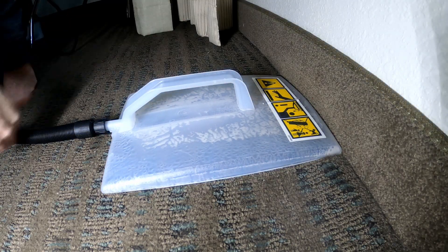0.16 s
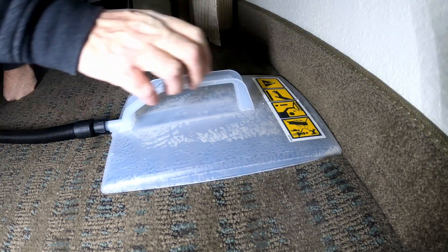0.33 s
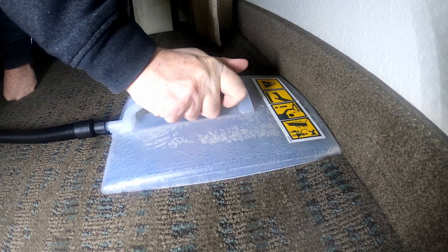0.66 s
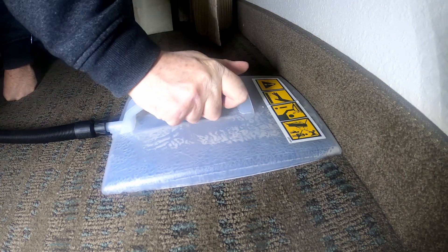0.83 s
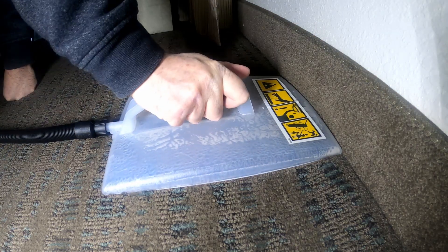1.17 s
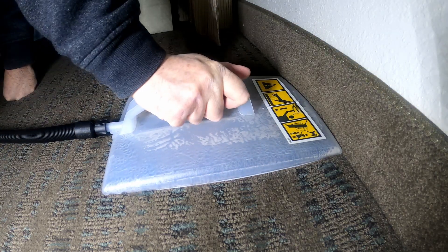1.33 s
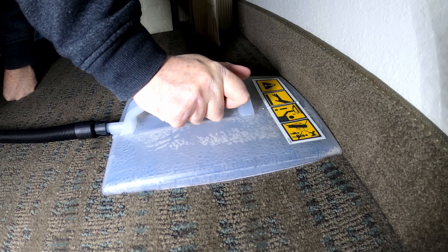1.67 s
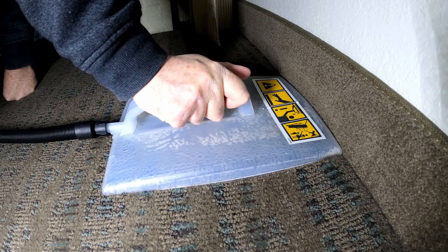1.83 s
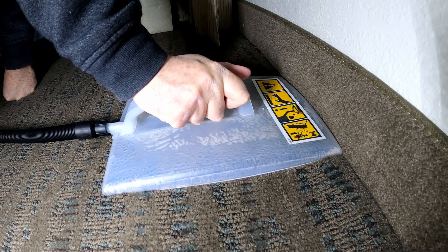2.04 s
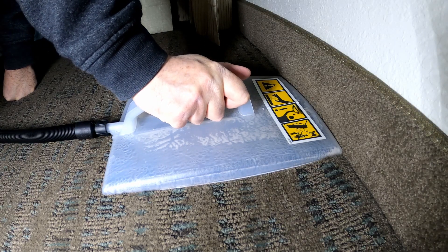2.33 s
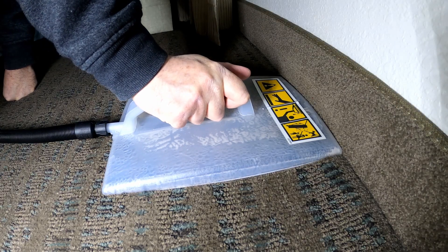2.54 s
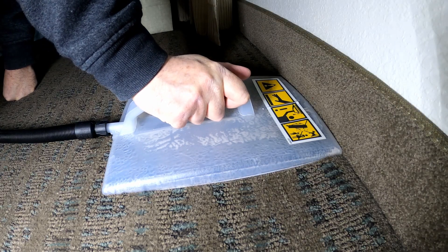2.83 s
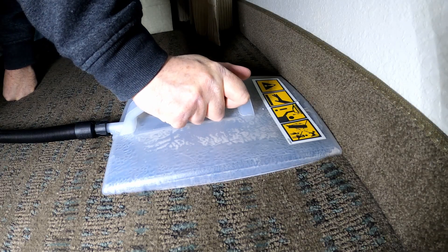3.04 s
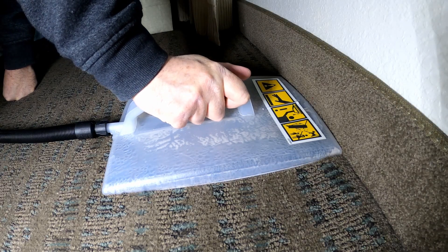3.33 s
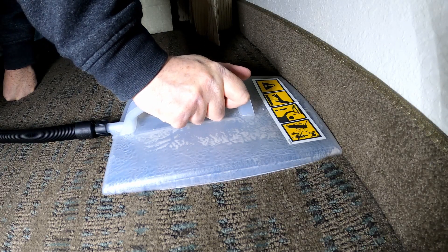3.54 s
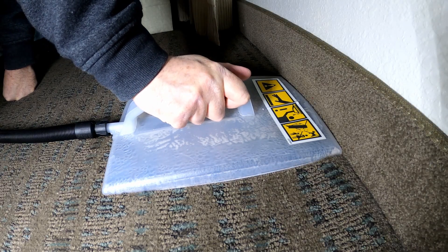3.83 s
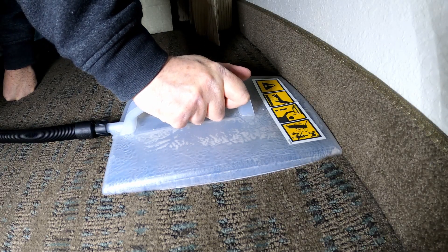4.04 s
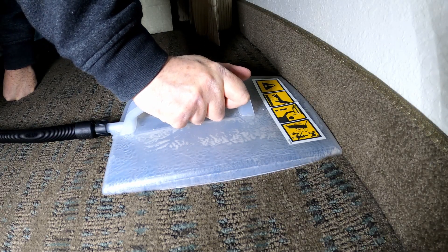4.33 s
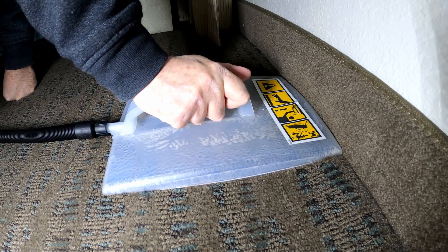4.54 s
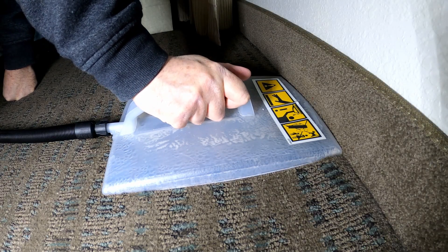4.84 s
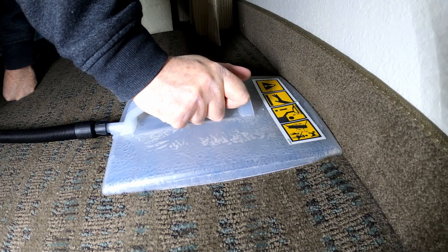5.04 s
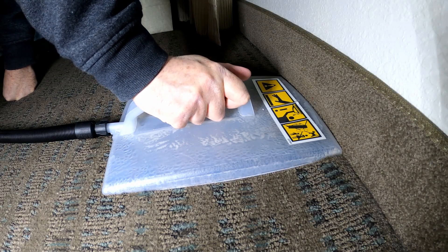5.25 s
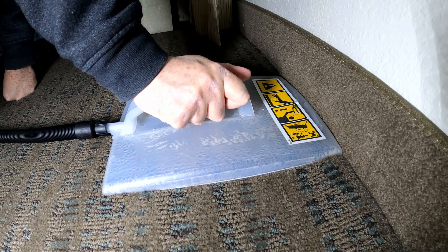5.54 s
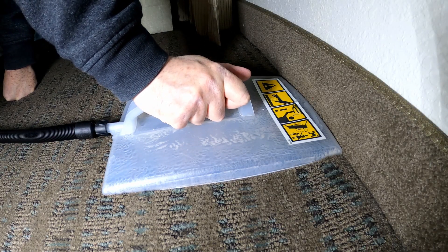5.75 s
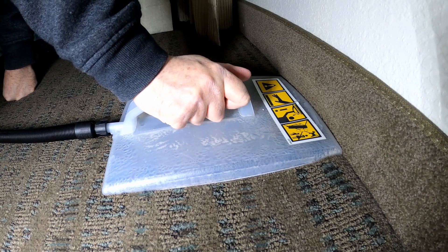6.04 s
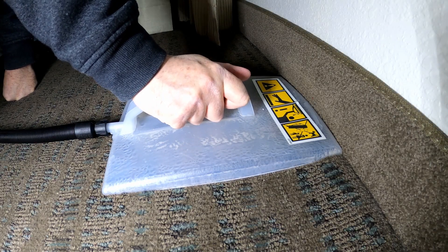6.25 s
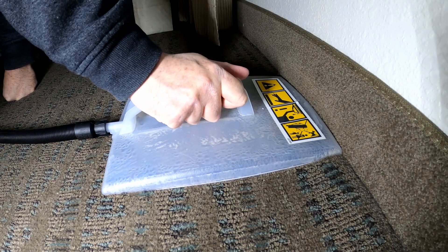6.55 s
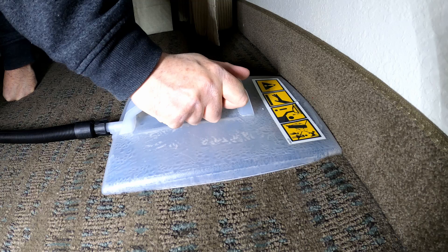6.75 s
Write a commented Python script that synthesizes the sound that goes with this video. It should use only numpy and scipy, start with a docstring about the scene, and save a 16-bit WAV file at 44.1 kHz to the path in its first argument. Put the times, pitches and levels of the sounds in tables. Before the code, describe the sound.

Throughout about seven seconds, a suction machine drones in the room at some distance: a low, boomy, muffled rush with slightly wavering mains hum and little treble. From 0 to 0.7 s a sleeve rustles close by with a soft airy swish; at 0.41-0.43 s a tight cluster of plastic clacks comes with a tiny finger scrape, then knocks at 0.6 and, sharper and loudest, 0.68 s, over a soft floor thud. At 1.12-1.2 s the strongest event arrives: a deep floor thump with a duller knock and broad scuff. Smaller bumps and a tap follow at 1.35-1.6 s, another thud and scuff around 1.8 s, a soft scuff near 2.55 s. Then mostly steady drone, with faint taps at 3.2 and 5.15 s, barely audible deep shudders at 3.7, 4.4, 5.1 and 5.7 s, small taps at 6.2 s, and slight rustle and low rumble near 6.8 s.

```python
"""Suction machine above a carpet

A suction machine drones some way off indoors: noise lifted at room modes, over wavering mains hum.
Near the ear a sleeve rustles, soles and skin scuff and fingers drag: friction noise in three colours.
A plastic tool is tapped and rings in short decaying modes, with faint treble ticks and an early swish.
Footsteps shake the floor: low near-sinusoidal swings over a deep rumble that comes and goes."""
import sys
import numpy as np
from scipy import signal
from scipy.fft import rfft, irfft
from scipy.io import wavfile
from scipy.ndimage import uniform_filter1d

SR = 44100
rng = np.random.default_rng(int(sys.argv[2]) if len(sys.argv) > 2 else 0)


def voltage_ratio(decibels):
    """Convert decibels (scalar or array-like) to amplitude ratios, 20 dB per decade."""
    exponent = np.asarray(decibels, float) / 20
    return 10 ** exponent


def store_pcm(level_fs):
    """Save levels as 16-bit WAV."""
    pcm = np.round(np.clip(level_fs, -1, 1) * 32767).astype(np.int16)
    wavfile.write(sys.argv[1], SR, np.atleast_2d(pcm).T)


N = 303849


def evened(x):
    """Normalization: scales a signal to rms 1."""
    return x / np.sqrt(np.mean(x ** 2) + 1e-20)


def read(points, hz):
    """Interpolates a spectrum on a logarithmic frequency axis."""
    f, value = np.transpose(points)
    return np.interp(np.log(hz + 1), np.log(f + 1), value)


def add(mix, s, sound):
    """Superposition: adds a sound from time s on."""
    part = mix[:, round(s * SR):][:, :sound.shape[-1]]
    part += sound[..., :part.shape[1]]


def panned(db):
    """Interchannel level difference: gains of left and right, db apart."""
    return voltage_ratio([[db / 2], [-db / 2]])


def noise(colour_db, size, patchy_db, swell_db, same_share, tilt_share):
    """Short-time synthesis of coloured stereo noise of rms 1 with set interchannel coherence."""
    # phase by which the left channel leads: (frequency [Hz], lead [rad])
    lead = [(44, -.06), (100, 0), (180, .02), (270, .13), (500, .23), (750, -.04), (1400, -.4),
            (2050, -.78), (3100, -.94), (3800, -.4), (5600, 1.66), (8400, 4.1), (12000, 6.2)]
    # coherence of the channels, before same_share: (frequency [Hz], coherence [0..1])
    alike = [(44, .997), (110, .9997), (180, .995), (270, .993), (410, .965), (600, .85), (750, .56),
             (920, .72), (1400, .76), (2050, .55), (2500, .63), (3800, .45), (5000, .25), (9000, .25)]
    # left-right difference, before tilt_share: (frequency [Hz], difference [dB])
    lean = [(270, 0), (500, -.6), (610, -2), (750, 1.3), (1120, 3.8), (1680, 1.4), (2500, 7), (3100, 4.3),
            (4600, 1.8), (6900, .2), (10000, 2)]
    hop, hz = size // 4, np.fft.rfftfreq(size, 1 / SR)
    frames = N // hop + 5
    a, b, c, d, patches = rng.standard_normal((frames, len(hz), 5)).T
    patches = uniform_filter1d(patches, size=size // 100, axis=0)
    patches = evened(uniform_filter1d(patches, size=6, axis=1))
    swell = evened(uniform_filter1d(rng.standard_normal(frames), size=12))
    same = np.clip(same_share * read(alike, hz), -1, 1)[:, None]
    left = a + 1j * b
    right = same * left + np.sqrt(1 - same ** 2) * (c + 1j * d)
    right = right * np.exp(-1j * read(lead, hz))[:, None]
    tilt = voltage_ratio(tilt_share * read(lean, hz) / 2)[:, None]
    level_db = colour_db(hz)[:, None] + patchy_db * patches + swell_db * swell
    spectra = np.array([left * tilt, right / tilt]) * voltage_ratio(level_db)
    return evened(signal.istft(spectra, nperseg=size, noverlap=size - hop)[1][:, :N])


def machine():
    """Resonance: low room and hose modes lift the broad rush; the motor adds a wavering mains hum."""
    # relative spectrum of the rush of machine and air: (frequency [Hz], density [dB per Hz])
    rush = [(9, -27), (32, -20.5), (45, -11), (91, -6.5), (128, -8.5), (149, -13), (235, -8), (334, -19.5),
            (500, -23.5), (749, -33.5), (1650, -39.5), (1900, -49.5), (5000, -54), (8500, -62.5),
            (10000, -85.5), (11500, -106), (14000, -130)]
    # modes that the rush excites: (frequency [Hz], width [Hz], lift above the rush [dB])
    room_modes = [(46.5, 11, 5.5), (71.15, 12.7, 13), (100.9, 8.7, 9.5), (118.4, 11.3, 7), (214, 47, 0),
                  (221.5, 66, 2.5), (280.8, 9.8, 8), (307, 23, 3.5), (369, 72, 2), (429, 34, 5.5),
                  (1484, 700, 5.5), (2153, 230, 7.5), (2600, 440, 7.5), (3300, 600, 5.5), (4370, 280, -0.5),
                  (4770, 150, 2)]
    # mains hum of the motor: (mean frequency [Hz], level before flutter [dB rms])
    hum = [(119, -40.5), (240, -46.5)]

    def colour_db(hz):
        lift = sum(db / (1 + (2 * (hz - f) / width) ** 2) for f, width, db in room_modes)
        return read(rush, hz) + lift
    out = voltage_ratio(-32.5) * noise(colour_db, size=8192, patchy_db=0.04, swell_db=0.05,
                             same_share=1, tilt_share=1.0)
    for hz, db in hum:
        wander = evened(uniform_filter1d(rng.standard_normal(N), size=8000))
        flutter = evened(uniform_filter1d(rng.standard_normal(N), size=5000))
        phase = 2 * np.pi * np.cumsum(hz * (1 + 0.00703 * wander)) / SR
        out += voltage_ratio(db + 0.71 * flutter) * np.sqrt(2) * np.sin(phase)
    return out


def friction_hiss():
    """Friction noise: returns a blend of middle, dull and airy hiss that rubbing surfaces share."""
    # relative spectra of the three parts: (frequency [Hz], density [dB per Hz])
    middle_colour, dull_colour = [(1300, -15.5), (2300, 4.5), (3600, 1.5), (5300, -13.5), (6500, -12),
                                  (8000, -26.5), (11000, -82)], [(250, -29.5), (500, 0), (800, 3), (1150, 7.5),
                                                     (1550, 6), (1800, 6), (2400, 1.5), (4000, -27),
                                                     (8000, -79.5)]
    airy_colour = [(3200, -27), (4300, 8.5), (5200, 5.5), (6500, -2.5), (7900, -0.5), (9000, -9),
                   (10000, -12.5), (12000, -21.5), (14500, -28.5), (17000, -69.5)]
    middle = noise(lambda hz: read(middle_colour, hz), size=512, patchy_db=1.5, swell_db=-0.5,
                   same_share=0.77, tilt_share=0.72)
    dull = noise(lambda hz: read(dull_colour, hz), size=512, patchy_db=2.0, swell_db=0.54,
                 same_share=1.15, tilt_share=0.74)
    airy = noise(lambda hz: read(airy_colour, hz), size=512, patchy_db=2.5, swell_db=0.9,
                 same_share=0.22, tilt_share=-.4)

    def hiss(span, dull_db, airy_db):
        return middle[:, span] + voltage_ratio(dull_db) * dull[:, span] + voltage_ratio(airy_db) * airy[:, span]
    return hiss


def rustle(hiss):
    """Amplitude and spectral modulation of friction noise: cloth moves near the ear, then settles."""
    # moving cloth: (time [s], level of the middle part [dB], brightness [dB])
    cloth = [(0, -52.5, -1), (.08, -54.5, -1), (.19, -57, -7), (.25, -53.5, 4), (.41, -54.5, 2.5),
             (.46, -58.5, -5.5), (.63, -55.5, -2), (.72, -60.5, -4), (1.0, -63.5, 1.5), (1.25, -62.5, -2),
             (1.5, -65.5, 2.5), (2.0, -69, -6.5), (2.5, -62, -5), (2.7, -65.5, -2), (4.101, -70, -10.5),
             (5.901, -68.5, -6), (6.12, -66, 0.5), (6.5, -66.5, -5), (6.8, -62.5, -6), (6.88, -66, -2)]
    s, *columns = np.transpose(cloth)
    db, bright_db = (np.interp(np.arange(N) / SR, s, c) for c in columns)
    # a brighter rustle loses dull hiss and gains airy hiss
    return voltage_ratio(db) * hiss(slice(None), 2 - 0.56 * bright_db, -6.5 + 0.65 * bright_db)


def swish():
    """Heterodyning: low-passed complex noise shifted up to a wandering centre gives a band of hiss."""
    # band of hiss near the start: (time [s], centre [Hz], level before panning [dB])
    path = [(0, 1500, -62), (.035, 1450, -54), (.09, 1700, -61.5), (.17, 1500, -54), (.21, 1650, -58),
            (.24, 1150, -56.5), (.3, 1150, -61), (.36, 1500, -63), (.45, 1500, -83)]
    pole_width_hz = 290
    s, *columns = np.transpose(path)
    t = np.arange(round(s[-1] * SR)) / SR
    hz, db = (np.interp(t, s, c) for c in columns)
    r, out = np.exp(-np.pi * pole_width_hz / SR), np.zeros((2, N))
    a, b = rng.standard_normal((2, 2, len(t)))
    z = a + 1j * b
    pair = np.array([z[0], 0.9 * z[0] + 0.5 * z[1]])  # nearly alike in both channels
    low = signal.lfilter([1], np.convolve([1, -r], [1, -r]), pair)
    band = (low * np.exp(2j * np.pi * np.cumsum(hz) / SR)).real
    add(out, 0, panned(2.5) * voltage_ratio(db) * evened(band))
    return out


def floor():
    """Forced vibration: landing weight makes boards swing for a few cycles, over a deep rumble."""
    # the deepest rumble: (time [s], level [dB])
    deep_level = [(0.0, -62), (0.8, -40), (1.48, -50), (1.73, -34.5), (2.2, -56), (2.74, -51),
                  (3.65, -40.5), (3.75, -35), (4.11, -45), (4.99, -40.5), (5.3, -44), (5.7, -37.5),
                  (6.1, -42), (6.66, -41), (6.89, -45.5)]
    # its relative spectrum: (frequency [Hz], density [dB per Hz])
    deep_colour = [(6, -21.5), (14, -9), (30, 6), (42, -13), (60, -39), (200, -94)]
    # shudders: (time of the peak [s], swing level there [dB rms], frequency [Hz], rise [s], fall [s])
    thuds = [(0.654, -23, 68, 0.006, 0.053), (1.143, -12, 84.5, 0.012, 0.019),
             (1.1961, -19, 73, 0.05, 0.062), (1.348, -28, 77, 0.029, 0.023),
             (1.46, -30.5, 78, 0.082, 0.046), (1.58, -28, 75, 0.026, 0.073),
             (1.623, -29, 48.4, 0.073, 0.11), (1.759, -20, 54, 0.053, 0.064),
             (1.838, -26, 48.3, 0.061, 0.18), (2.53, -33, 37, 0.1, 0.066), (2.64, -36, 33, 0.05, 0.071),
             (3.72, -31.5, 14, 0.12, 0.071), (4.425, -27.5, 12, 0.11, 0.078),
             (5.061, -26.5, 22, 0.099, 0.044), (5.687, -31, 20, 0.14, 0.2), (6.797, -32.5, 40, 0.06, 0.58)]
    edge_db, roundness = -22.5, 2.47  # level one rise before or one fall after the peak; arch power
    t = np.arange(N) / SR
    deep = noise(lambda hz: read(deep_colour, hz), size=8192, patchy_db=3.5, swell_db=2.0,
                 same_share=0.99, tilt_share=0)
    out = voltage_ratio(np.interp(t, *np.transpose(deep_level))) * deep
    for s, db, hz, rise, fall in thuds:
        away = abs(t - s) / np.where(t < s, rise, fall)
        turn = 2 * np.pi * hz * (t - s)
        # the boards swing unevenly, which adds the octave
        swing = np.sqrt(2) * (np.cos(turn) + voltage_ratio(-18.5) * np.sin(2 * turn))
        rough = voltage_ratio(-6.5 - 0.2681 * (hz - 16.0)) * deep[0]  # unpitched share, less at higher pitch
        out += voltage_ratio(db + edge_db * away ** roundness) * (swing + rough)
    return out


def fibre_snags():
    """Stick-slip: fibres catch and let go, as smoothed noise of rms 1."""
    return evened(uniform_filter1d(uniform_filter1d(rng.standard_normal(N), size=70), size=40))


def scuffs(hiss, snags):
    """Decaying friction: soles and skin scuff with a quick rise and a tail that darkens."""
    # (time [s], level of the middle part before rise and decay [dB], dull part above that [dB],
    # airy part above that [dB], both at the onset, t60 of the middle part [s], left-right [dB])
    strokes = [(.21, -62, -3, -1, .2, 2), (.223, -63.5, 12, 6, .2, 3), (.434, -63, -4, 0, 0.11, -8),
               (.528, -59, -10, 8.5, 0.47, -0.5), (.54, -65, -8, -6, 0.51, -3),
               (.719, -63, -11, 3, 0.084, -9), (.903, -75, -8, -2, .13, -24),
               (1.122, -49, 8, -8, 0.14, 5.5), (1.132, -47.5, -1.5, -9, 0.23, -3),
               (1.15, -55.5, 1.5, -21, 0.26, 1.5), (1.178, -66, 0, -15, 0.3, 1),
               (1.359, -71, 1, -6, 0.12, 4), (1.569, -65, 1.5, 0, 0.1, 6), (1.822, -52.5, 0.5, -11, 0.2, 3),
               (1.837, -57, -11, -20, 0.25, 2.5), (2.572, -54.5, 3.5, -23, 0.24, 0),
               (6.069, -69, -10, -1, 0.15, -3)]
    u, out = np.arange(SR // 2) / SR, np.zeros((2, N))
    for s, db, dull_db, airy_db, t60, pan_db in strokes:
        span = slice(round(s * SR), round(s * SR) + len(u))
        rise = 1 - np.exp(-u / (0.013 * t60))
        stroke = rise * voltage_ratio(db - 60 * u / t60 + 0.2 * snags[span])
        tail = hiss(span, dull_db + 13 * u / t60, airy_db - 14 * u / t60)
        add(out, s, panned(pan_db) * stroke * tail)
    return out


def ticks():
    """High-passed impulses: faint thin clicks with little below their lower edge."""
    # (time of the centre [s], peak before panning [dB], lower edge [Hz], left-right [dB])
    clicks = [(0.3872, -50, 7000, -2.5), (.647, -49, 12000, 5), (2.699, -58, 10500, -2)]
    out, hz = np.zeros((2, N)), np.fft.rfftfreq(128, 1 / SR)
    u = np.arange(-64, 64) / SR
    for s, db, edge_hz, pan_db in clicks:
        click = np.roll(irfft(1 / (1 + (edge_hz / (hz + 1)) ** 10)), 64)
        click = click * np.exp(-(u / 0.00027) ** 2)
        add(out, s + u[0], panned(pan_db) * voltage_ratio(db) * click / abs(click).max())
    return out


def taps():
    """Modal synthesis: a tap on plastic is a dry crack and the ring of short decaying modes."""
    # (time [s], peak of the ring before panning [dB], brightness [dB per octave], left-right [dB])
    hits = [(0.411, -28.5, 6, -1), (0.419, -32, -4, -2), (0.4254, -33.5, 2, -2), (0.429, -28.5, -0.5, -3.5),
            (0.4325, -29.5, 1.5, -3), (0.6, -28, -3, 2), (0.6785, -21, 3.5, -3.5),
            (1.124, -23.5, -6.5, 0.5), (1.362, -33, -3.5, -2), (3.192, -35.5, -7, -2),
            (5.15, -40, -3.5, -2), (6.1926, -32.5, -2.5, -2), (6.2607, -41, 1, -3)]
    # modes of the plastic: (frequency [Hz], relative level [dB], t60 [s])
    plastic = [(350, 13.5, 0.03), (536, 10.5, 0.03), (1034, 2.5, 0.017), (1680, -4, 0.028),
               (2200, 0.5, 0.011), (3500, -5, 0.015), (4120, -1.5, 0.0086), (5060, -9.5, 0.017),
               (5900, -17.5, 0.0056), (6350, -21, 0.011), (8260, -34, 0.018), (11000, -33, 0.0047),
               (13150, -40, .006)]
    # soft skin rounds off the crack: (frequency [Hz], gain [dB])
    crack_top = [(7000, -1), (15000, -28)]
    out, u = np.zeros((2, N)), np.arange(3000) / SR
    hz = np.fft.rfftfreq(len(u), 1 / SR)
    contact = 1 - np.exp(-(u / 0.00024) ** 2)  # the force builds over a fraction of a millisecond
    for s, db, bright_db, pan_db in hits:
        ring = np.zeros(len(u))
        for f, level_db, t60 in plastic:
            sign = -1 if rng.random() < .5 else 1
            decay = voltage_ratio(level_db + bright_db * np.log2(f / 1000) - 60 * u / t60)
            ring += sign * decay * np.sin(2 * np.pi * f * u) * contact
        colour_db = read([row[:2] for row in plastic], hz) + read(crack_top, hz)
        colour_db = colour_db + bright_db * np.log2(np.maximum(hz, 300) / 1000)
        crack = irfft(rfft(rng.standard_normal(len(u))) * voltage_ratio(colour_db), len(u))
        crack = crack * voltage_ratio(-60 * u / 0.014) * contact  # t60 of 14 ms
        sound = ring / abs(ring).max() + voltage_ratio(-4.5) * crack / abs(crack).max()
        add(out, s, panned(pan_db) * voltage_ratio(db) * sound)
    return out


def drags(hiss, snags):
    """Stick-slip friction: fingers drag over the plastic handle with a crackle and stop short."""
    # (start [s], stop [s], middle part's level at the start [dB], growth [dB],
    # dull part above the middle [dB], airy part above the middle [dB], left-right [dB])
    strokes = [(0.413, 0.434, -57.5, 5, -14, 7.5, -5.5)]
    t, out = np.arange(N) / SR, np.zeros((2, N))
    crackle = evened(uniform_filter1d(snags, size=30))
    for s, stop, db, growth_db, dull_db, airy_db, pan_db in strokes:
        held = np.clip(np.minimum(t - s, stop - t) / 0.0013, 0, 1) ** 2
        growth = growth_db * np.clip((t - s) / (stop - s), 0, 1)
        stroke = held * voltage_ratio(db + growth - 2 * crackle)
        out += panned(pan_db) * stroke * hiss(slice(None), dull_db, airy_db)
    return out


def scene():
    """Linear superposition of all sources; the rubbing ones share one hiss."""
    hiss, snags = friction_hiss(), fibre_snags()
    out = machine() + rustle(hiss) + swish() + floor()
    return out + scuffs(hiss, snags) + ticks() + taps() + drags(hiss, snags)


def roll_off(x):
    """The treble ends steeply here."""
    return signal.sosfilt(signal.butter(12, 15000, fs=SR, output="sos"), x)


def record(dry):
    """Signal chain: the finished mix passes on at unit gain."""
    return roll_off(dry)


dry = scene()
out = record(dry)
store_pcm(out)
```